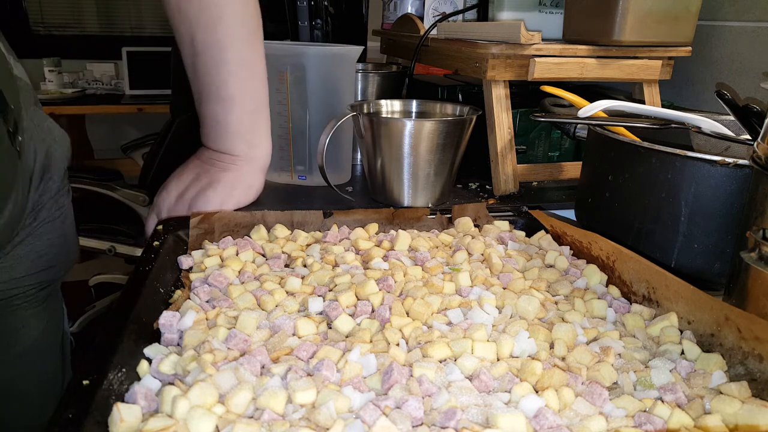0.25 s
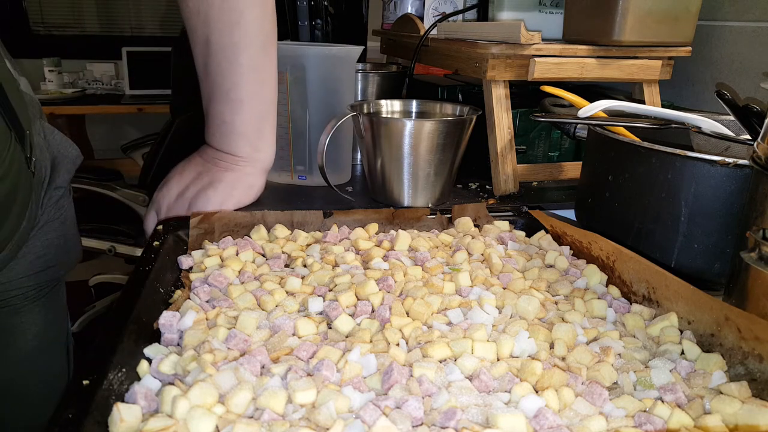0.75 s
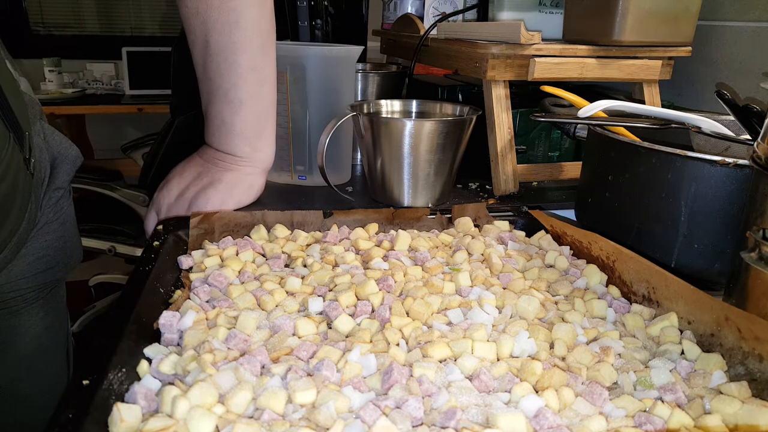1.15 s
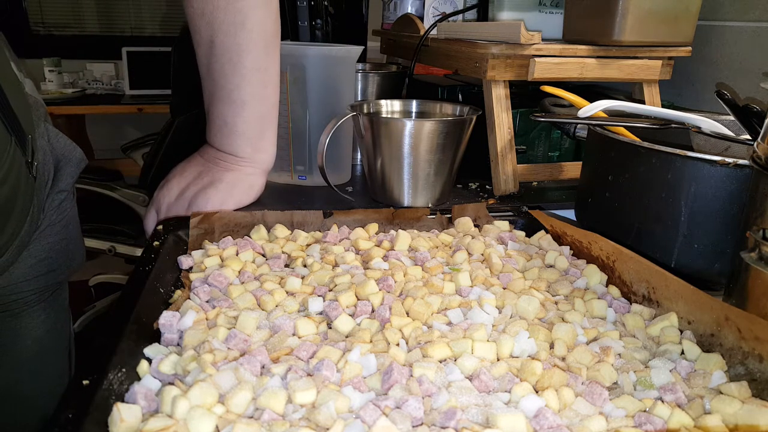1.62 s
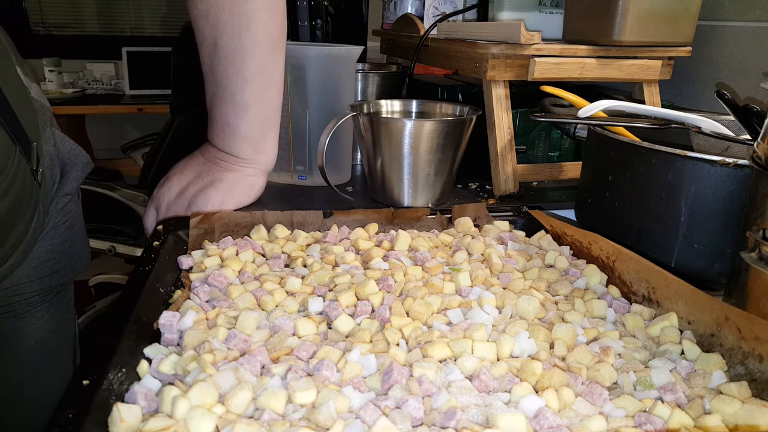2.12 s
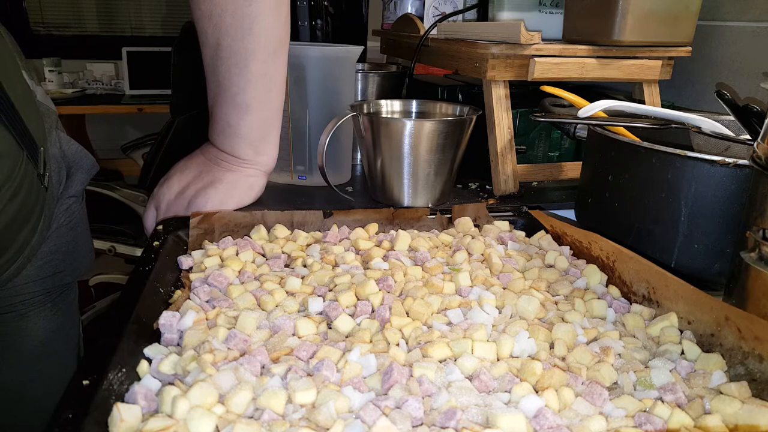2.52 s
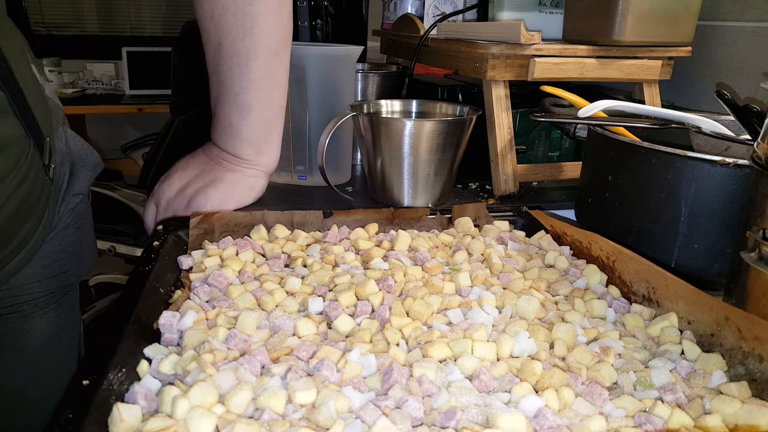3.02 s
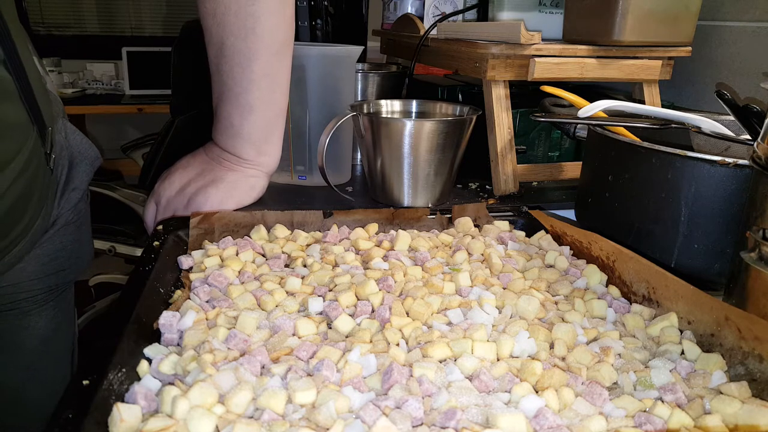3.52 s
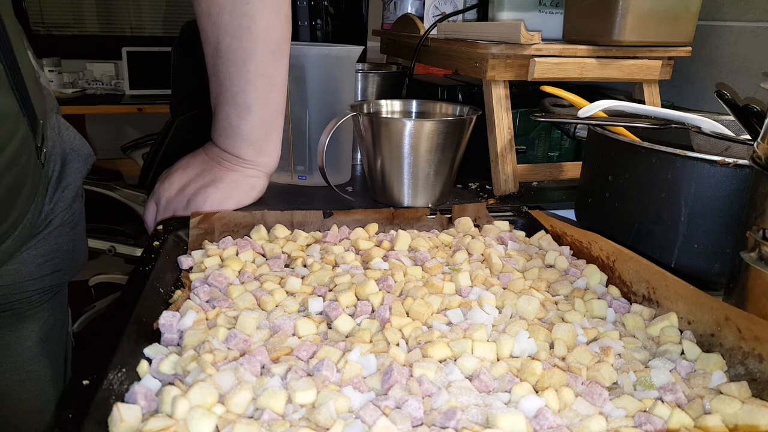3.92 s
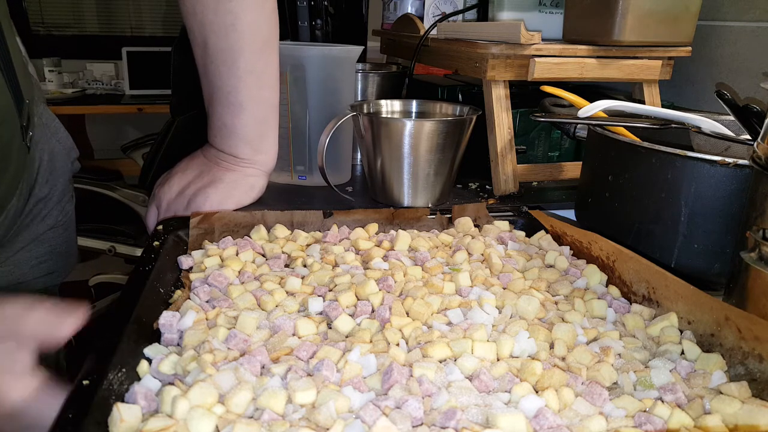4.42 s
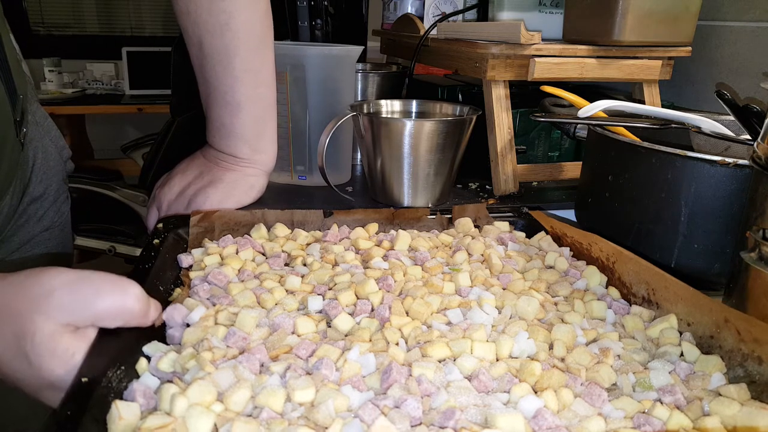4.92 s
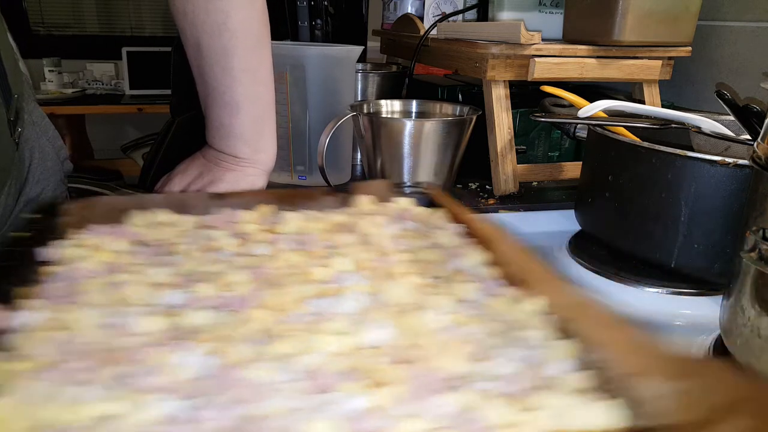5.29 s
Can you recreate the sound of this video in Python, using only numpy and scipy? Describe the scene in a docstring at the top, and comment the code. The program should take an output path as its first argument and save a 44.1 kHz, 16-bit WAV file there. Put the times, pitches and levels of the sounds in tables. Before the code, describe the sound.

Over a faint kitchen hum, a sheet-metal door rattles and drops open; soft taps follow, and a tray knocks and slides.

```python
"""A motor hums in a small kitchen. Below the counter a sheet-metal door, probably the oven's, is tugged
open: its catch lets go, the panel rings and bends, the hinges clatter, and at 1.6 s it drops onto its
stops. Each impact excites damped modes. From 2 to 4 s light taps sound on hollow things. Near 4.8 s a hand
grips a paper-lined baking tray of diced vegetables, bumps it and slides it off the hob, and stick-slip
friction drives the resonances of its sheet metal."""
import sys
import numpy as np
from scipy import signal
from scipy.fft import rfft, irfft, next_fast_len
from scipy.io import wavfile
from scipy.ndimage import map_coordinates

SR = 44100
rng = np.random.default_rng(int(sys.argv[2]) if len(sys.argv) > 2 else 0)


def wav_out(sig):
    """Save sig, one row per channel (or a flat mono array), as 16-bit PCM at SR to the path in sys.argv[1]."""
    wavfile.write(sys.argv[1], SR, np.round(np.clip(np.atleast_2d(sig).T, -1, 1) * 32767).astype(np.int16))


N = 244755

# spectrum of the struck door metal: (f/Hz, level/dB)
METAL_SPECTRUM = [(65, -50), (120, -1), (230, -20), (340, -3), (450, -5.5), (680, -3), (1000, -5.5),
                  (1400, -8.5), (2000, -10), (2700, -10), (4500, -28.5), (8400, -36), (10000, -48),
                  (15800, -51)]
# modes of the hinge stops: (f/Hz, level/dB, t60/s)
STOP_MODES = [(345, 3, .54), (401, -3, .56), (532, -10, .45), (581, -9, .45), (634, -3, .42), (675, -2, .4),
              (738, -8, .4), (837, -7, .45), (1448, -6, .38), (1602, -8, .45), (1652, -8, .42),
              (1911, -7, .3), (2153, -11, .45), (2303, -7, .35), (2381, -7, .35), (2498, -9, .35),
              (2587, -8, .38), (2698, -8, .38), (2911, -11, .35), (3741, -13, .22), (4802, -13, .17)]
def door_slam():
    """Impact excitation: the door lands on its stops with a click, a dense rattle and ringing modes."""
    out = np.zeros((2, N))
    click = contact(METAL_SPECTRUM, body_db=-57, mid_db=-25, treble_db=-28)
    rattle = contact(METAL_SPECTRUM, body_db=-34.5, mid_db=-26, treble_db=-38)
    add(out, 1.5625, knock(click, t60=0.038, crack_db=5, crack_t60=0.0042))
    add(out, 1.563, knock(rattle, t60=0.46, crack_db=2.5, rise=0.0019, crack_t60=0.012))
    add(out, 1.563, amp(-31) * ring(STOP_MODES, attack=0.0047))
    return out * amp([[.8], [-.8]])  # slightly to the left


# spectrum of the catch: (f/Hz, level/dB)
CATCH_SPECTRUM = [(65, -31), (110, 1), (214, -20), (331, -8), (809, -13.5), (1020, -16), (1610, -7),
                  (1780, -29), (2060, -9.5), (3120, -28), (3930, -30), (4180, -44), (6330, -39.5),
                  (7170, -51.5), (15800, -56)]
# modes of the door panel: (f/Hz, level/dB, t60/s)
PANEL_MODES = [(172, -7, 0.43), (206, 4.5, 0.12), (297, -16.5, 1), (359.5, -17, 1), (480, -4.5, 0.13),
               (592, -10, 0.13), (1194, 1.5, 0.096), (1295, -18, 1), (1420, -10.5, 0.43),
               (1700, -6.5, 0.13), (1820, -16, 0.14), (2020, -19, .3), (1970, -20, 0.55), (2220, -23, 0.84),
               (3780, -22.5, 0.31), (6400, -32, 0.22), (6600, -20.5, 0.091)]
def door_catch(flex_s=0.882, flex_hz=205, climb_hz_per_s=1240):
    """Free vibration: the catch lets go, the panel rings, and its tone climbs as it bends."""
    out = np.zeros((2, N))
    release = contact(CATCH_SPECTRUM, body_db=-40.5, mid_db=-35.5, treble_db=-52)
    add(out, 0.798, knock(release, t60=0.31, crack_db=2.5, rise=0.0018))
    add(out, 0.799, amp(-31.5) * ring(PANEL_MODES, attack=0.0039))
    t = np.arange(N) / SR - flex_s  # zero at mid-bend
    phase = 2 * np.pi * (flex_hz * t + climb_hz_per_s * t * t / 2)
    return out + amp(-40.5) * stroke(flex_s, swell=0.015) * np.sin(phase)


# hinge contacts, and at 1.536 s a soft rub just before the drop: (t/s, mid level/dB, body level/dB, treble
# level/dB)
HINGE_CONTACTS = [(0.605, -60, -55, -75), (0.975, -49.5, -46.5, -60.5), (1.045, -38.5, -40.5, -59),
                  (1.087, -36, -50.5, -37), (1.154, -39.5, -46.5, -62.5), (1.536, -56.5, -54, -54),
                  (1.585, -36, -51, -70), (1.65, -67, -38, -80)]
# heavy shoves: (t/s, level/dB)
SHOVES = [(0.611, -51), (0.803, -34.5), (0.978, -41), (1.067, -35), (1.565, -49), (1.655, -33.5),
          (1.688, -33)]
# modes of the cabinet: (f/Hz, level/dB, t60/s)
CABINET_MODES = [(51.75, -11.5, 1), (84, -14.5, 0.6), (104.8, -5, 0.75), (162, -7, 0.56),
                 (224, -12.5, 0.66)]
def door_clatter():
    """Structure-borne sound: the hinges clatter, a soft rub leads into the drop, and each heavy shove excites
    the cabinet's low modes."""
    out = np.zeros((2, N))
    for s, mid_db, body_db, treble_db in HINGE_CONTACTS:
        colour = contact(METAL_SPECTRUM, body_db, mid_db, treble_db)
        add(out, s, knock(colour, t60=0.47, crack_db=-6.5, rise=0.0017))
    for s, db in SHOVES:
        add(out, s, amp(db) * ring(CABINET_MODES, attack=0.0025))
    return out


# bumps of the tray on the hob: (t/s, pulse level/dB, body level/dB)
TRAY_BUMPS = [(4.881, -43.5, -50), (4.926, -64, -53), (4.964, -23.5, -40), (5.008, -53, -53.5),
              (5.036, -38, -57)]
# spectrum of a bump: (f/Hz, level/dB)
BUMP_SPECTRUM = [(65, -34), (110, -4), (144, -18), (292, -9), (434, 0), (502, -27), (556, -7.5), (916, -23),
                 (1420, -11.5), (2540, -27), (6600, -45), (7630, -38), (15800, -95)]
# modes of the loaded tray: (f/Hz, level/dB, t60/s)
LOADED_MODES = [(107.4, -7.5, 0.33), (198, 2, 0.3), (287, 1, 0.32), (496, 1, 0.26), (967, -2, 0.1),
                (1362, -2.5, 0.078), (2114, -18, 0.22)]
def tray_bumps(pulse_hz=1000):
    """Impact radiation: each bump gives one sharp push of air, then ringing that the vegetables damp."""
    out = np.zeros((2, N))
    u = np.pi * (pulse_hz * np.arange(SR // 100) / SR - 1)
    pulse = (2 * u * u - 1) * np.exp(-u * u)  # its spectrum peaks at pulse_hz
    for s, pulse_db, body_db in TRAY_BUMPS:
        colour = contact(BUMP_SPECTRUM, body_db, mid_db=pulse_db - 8.5, treble_db=body_db - 7)
        add(out, s, amp(pulse_db) * pulse)
        add(out, s, knock(colour, t60=0.15, crack_db=1, crack_t60=0.023, left_db=4))
        add(out, s, amp(body_db + 1.5) * ring(LOADED_MODES, attack=0.0033))
    return out


# pushes of the tray: (peak t/s, swell time/s, scrape level/dB, grit level/dB)
TRAY_PUSHES = [(5.094, 0.014, -34.5, -56), (5.201, 0.025, -35.5, -41)]
# resonances of the tray's sheet metal: (f/Hz, bandwidth/Hz, level/dB)
SHEET_RESONANCES = [(215, 29, -2), (289, 13, -2), (381, 40, 6), (485, 36, -2), (746, 60, -7.5),
                    (1130, 75, 5), (1240, 41, 2), (1435, 31, 3.5), (1760, 29, -3), (1976, 17, 8.5),
                    (2133, 42, -3), (2724, 30, 4.5), (3050, 51, 0), (3870, 63, -7), (4230, 37, -34),
                    (4830, 50, -9)]
# spectrum of the friction: (f/Hz, level/dB)
SCRAPE_SPECTRUM = [(88, -6), (170, -7.5), (370, 1), (520, -2), (720, -4.5), (1000, 0), (1400, 2),
                   (2100, -6.5), (4500, -18), (6300, -27), (8200, -26), (10000, -43), (15800, -38)]
def tray_slide(grit_lag_s=0.0053):
    """Stick-slip friction: in two pushes, uneven slips ring the tray's sheet metal; grit adds a hiss."""
    scrape_gain = sum(amp(db) * stroke(s, swell) for s, swell, db, _ in TRAY_PUSHES)
    grit_gain = sum(amp(db) * stroke(s + grit_lag_s, swell) for s, swell, _, db in TRAY_PUSHES)
    sheet = lambda f: sum((-1) ** k * amp(db) * 1j * f * width / (f0 * f0 - f * f + 1j * f * width)
                          for k, (f0, width, db) in enumerate(SHEET_RESONANCES))
    slips = grains(rate=1700, spread_db=4)
    rubbing = amp(-4.5) * unit(filtered(slips, lambda hz: amp(along(SCRAPE_SPECTRUM, hz))))
    ringing = amp(-5.5) * unit(filtered(slips, sheet))
    grit_colour = contact(SCRAPE_SPECTRUM, body_db=-60, mid_db=-12, treble_db=0, high_hz=2220)
    hiss = unit(filtered(grains(rate=3900, spread_db=4), grit_colour))
    return room(scrape_gain * (rubbing + ringing) + grit_gain * hiss, t60=0.19, direct_db=-6)


# light taps: (t/s, level/dB, treble re that level/dB, resonance f/Hz)
LIGHT_TAPS = [(1.983, -46, -11.5, 827), (2.378, -64.5, -24, 422), (2.779, -66.5, -3, 695),
              (2.991, -61, -4, 2680), (3.333, -60.5, -2, 2080), (3.464, -48.5, -15, 730),
              (3.594, -59.5, -28, 1600), (3.612, -55.5, -0.5, 7240), (3.721, -62.5, -20, 1340),
              (3.979, -48.5, -6, 1370), (4.004, -63.5, 6.5, 7600)]
# spectrum of a tap: (f/Hz, level/dB)
TAP_SPECTRUM = [(88, -7), (220, -18), (310, -6), (460, -7), (750, -9.5), (1050, -8), (1600, -8),
                (2200, -12), (4400, -5), (7400, -11.5), (10000, -21), (12500, -15.5), (15800, -17)]
# modes shared by all taps: (f/Hz, level/dB, t60/s)
HOLLOW_MODES = [(311.3, -0.5, 0.29), (740, 1.5, 0.18), (1247, -0.5, 0.21), (1610, -2, 0.17),
                (1695, 4.5, 0.11)]
def taps(half_width_hz=123):
    """Resonance: soft contacts on hollow things each stress one tone, heard mostly by way of the room."""
    out = np.zeros((2, N))
    for s, db, bright_db, tone_hz in LIGHT_TAPS:
        colour = contact(TAP_SPECTRUM, body_db=db - 2.5, mid_db=db, treble_db=db + bright_db)
        hollow = lambda hz: colour(hz) * (1 + amp(8) / (1 + ((hz - tone_hz) / half_width_hz) ** 2))
        add(out, s, knock(hollow, t60=0.21, crack_db=-5, rise=0.0041))
        add(out, s, amp(db - 5.5) * ring(HOLLOW_MODES, attack=0.0022))
    return out


# crackles of the paper: (t/s, level/dB)
CRACKLES = [(4.849, -51.5), (5.226, -52.5)]
# finger strokes: (peak t/s, swell time/s, level/dB)
FINGER_STROKES = [(4.77, 0.012, -49.5), (4.833, .018, -51.5), (4.89, .007, -60), (4.948, 0.024, -54)]
# spectrum of the paper: (f/Hz, level/dB)
PAPER_SPECTRUM = [(150, -45), (250, -12), (297, -15), (330, -7), (421, -9), (536, -2.5), (1000, -13.5),
                  (1470, -2), (2190, -7), (3430, -10), (15800, -21.5)]
def paper():
    """Friction noise: fingers brush the tray's edge and its paper lining, which crackles."""
    out = np.zeros((2, N))
    snap = contact(PAPER_SPECTRUM, body_db=-11, mid_db=0, treble_db=0)
    for s, db in CRACKLES:
        add(out, s, amp(db) * knock(snap, t60=0.13, crack_db=7))
    brushing = sum(amp(db) * stroke(s, swell) for s, swell, db in FINGER_STROKES)
    rustle = unit(filtered(grains(rate=5100, spread_db=0), lambda hz: amp(along(PAPER_SPECTRUM, hz))))
    return out + room(brushing * rustle, t60=0.045, direct_db=-12.5)


# harmonics of the motor: (order, level/dB)
MOTOR_HARMONICS = [(1, -63.5), (2, -71.5), (3, -82.5), (4, -75), (5, -86), (8, -83.5), (15, -81), (16, -86)]
# spectrum of the room's rush: (f/Hz, level/dB)
AIR_SPECTRUM = [(25, -14), (70, -7.5), (140, -6), (260, -10.5), (400, -8.5), (520, -12.5), (900, -16),
                (1500, -17), (3000, -21), (5000, -27.5), (8000, -30.5), (10500, -36.5), (15800, -29.5)]
def motor_and_air(motor_hz=48.87):
    """Periodic excitation: a motor pulses softly once a turn and faintly whines, over the room's rush."""
    t = np.arange(N) / SR
    drift = lambda rate: map_coordinates(rng.standard_normal(int(N * rate / SR) + 4), [t * rate])
    turns = motor_hz * t + rng.random()
    hum = sum(amp(db + 0.31 * drift(3.5)) * np.sqrt(2) * np.cos(2 * np.pi * round(order) * turns)
              for order, db in MOTOR_HARMONICS)
    air = unit(filtered(diffuse(N), lambda hz: amp(along(AIR_SPECTRUM, hz))))
    return hum + air * amp(-65.5 + 0.5 * drift(3.14))


def contact(spectrum, body_db, mid_db, treble_db, low_hz=450, high_hz=3500):
    """Impact spectrum: three bands, weighted for the contact's mass and hardness, add in power."""
    hz = np.fft.rfftfreq(SR, 1 / SR)
    low = 1 / (1 + (hz / low_hz) ** 6)
    high = 1 - 1 / (1 + (hz / high_hz) ** 8)
    bands = zip((body_db, mid_db, treble_db), (low, (1 - low) * (1 - high), high))
    power = sum((amp(db) * unit(share * amp(along(spectrum, hz)))) ** 2 for db, share in bands)
    return lambda f: np.interp(f, hz, np.sqrt(power))


def knock(response, t60, crack_db, rise=0.00059, crack_t60=0.0072, left_db=3):
    """Direct and diffuse sound: a crack reaches the left microphone first, then dense ringing builds."""
    t = np.arange(SR) / SR
    crack = filtered(rng.standard_normal(SR), response) * fade(t, crack_t60)
    delayed = np.pad(crack, (14, 0))[:SR]
    direct = np.array([crack * amp(left_db), delayed * amp(-left_db)])
    tail = damped(filtered(diffuse(SR), response), t60)
    return amp(crack_db) * direct + tail * (1 - np.exp(-t / rise))


def ring(modes, attack, scatter_db=1):
    """Modal superposition: damped sines, the higher ones out of phase at the two microphones."""
    t = np.arange(SR) / SR
    out = np.zeros((2, SR))
    for hz, db, t60 in modes:
        skew = stereo_angle(hz) * rng.choice([-1, 1])
        phase = rng.uniform(0, 2 * np.pi) + np.array([[skew], [-skew]])
        out += amp(db + scatter_db * rng.normal()) * np.sin(2 * np.pi * hz * t + phase) * fade(t, t60)
    return out * (1 - np.exp(-t / attack))


def stroke(s, swell):
    """Envelope of a smooth movement: it gathers speed, peaks at time s and eases off."""
    return 1 / np.cosh(np.clip((np.arange(N) / SR - s) / swell, -20, 20))


def grains(rate, spread_db):
    """Shot noise: tiny slips of random size, on average `rate` a second."""
    slips = (rng.random(N) < rate / SR) * rng.standard_normal(N)
    return unit(slips * amp(spread_db * rng.standard_normal(N)))


def room(x, t60, direct_db):
    """Reverberation: convolution with the direct sound and the echoes of hob and walls, at unit energy."""
    response = damped(diffuse(SR // 2), t60)
    response /= np.linalg.norm(response[0])
    response[:, 0] += amp(direct_db)
    return signal.fftconvolve(x[None], response / np.linalg.norm(response[0]), axes=1)[:, :N]


# decay time across the spectrum: (f/Hz, factor on t60)
DECAY_FACTORS = [(150, 1.28), (600, 1.144), (2500, 1.123), (7000, 0.86), (13000, 0.72)]
def damped(x, t60):
    """Frequency-dependent damping: the treble dies first."""
    hz, t, spectra = signal.stft(x, SR, nperseg=256)
    decay = fade(t, t60 * along(DECAY_FACTORS, hz)[:, None])
    return signal.istft(spectra * decay, SR, nperseg=256)[1][:, :x.shape[-1]]


# likeness of left and right: (f/Hz, correlation)
CORRELATION = [(60, 1), (130, 0.66), (290, 0.88), (650, 0.26), (1400, -0.21), (3000, 0.036), (7000, 0.0016)]
def stereo_angle(hz):
    """Spatial coherence: half the phase angle whose cosine is the left-right correlation."""
    return np.arccos(np.clip(along(CORRELATION, hz), -1, 1)) / 2


def diffuse(size):
    """Diffuse field: white noise at two close microphones, alike only in the bass."""
    shares = lambda hz: np.array([np.cos(stereo_angle(hz)), np.sin(stereo_angle(hz))])
    mid, side = filtered(rng.standard_normal((2, size)), shares)
    return unit(np.array([mid + side, mid - side]))


def amp(db):
    """Decibels to amplitude ratio."""
    return 10 ** (np.asarray(db) / 20)


def unit(x):
    """Normalisation to rms 1."""
    return x / np.sqrt(np.mean(x ** 2) + 1e-20)


def along(points, hz):
    """Interpolation of (f/Hz, value) points on a log frequency axis."""
    f, v = np.transpose(points)
    return np.interp(np.log(hz + 1), np.log(f + 1), v)


def fade(t, t60):
    """Exponential decay by 60 dB in t60."""
    return np.exp(-np.log(1000) * t / np.maximum(t60, 1e-4))


def filtered(x, response):
    """Linear filtering: the spectrum of x times a frequency response."""
    n = x.shape[-1]
    m = next_fast_len(n + SR // 4)
    return irfft(rfft(x, m) * response(np.fft.rfftfreq(m, 1 / SR)), m)[..., :n]


def add(out, s, x):
    """Superposition of x on out from time s."""
    part = out[:, round(s * SR):][:, :x.shape[-1]]
    part += x[..., :part.shape[-1]]


def scene():
    """Superposition: the pressures of all the kitchen's sources add."""
    door = door_catch() + door_clatter() + door_slam()
    return door + taps() + tray_bumps() + tray_slide() + paper() + motor_and_air()


# imbalance of the microphones: (f/Hz, left minus right level/dB)
IMBALANCE = [(60, -2), (120, -3.5), (250, -1.5), (600, -1), (1200, 0), (2200, 2), (4200, -3.5), (8000, 2),
             (14000, 1)]
def record(dry, top_hz=15850):
    """Frequency response: the two microphones differ slightly in colour; nothing passes above top_hz."""
    coloured = filtered(dry, lambda hz: amp(np.outer([.5, -.5], along(IMBALANCE, hz))))
    return filtered(coloured, lambda hz: hz < top_hz)


dry = scene()
out = record(dry)
wav_out(out)
```